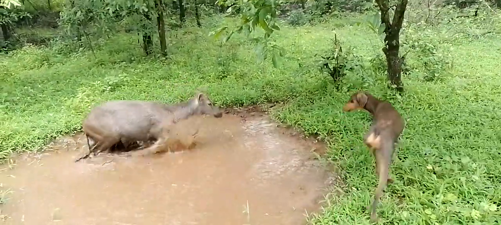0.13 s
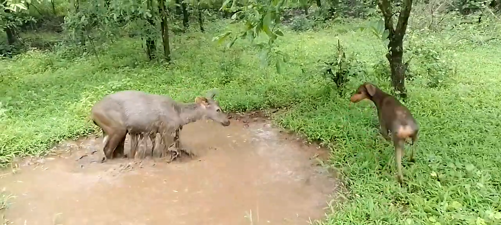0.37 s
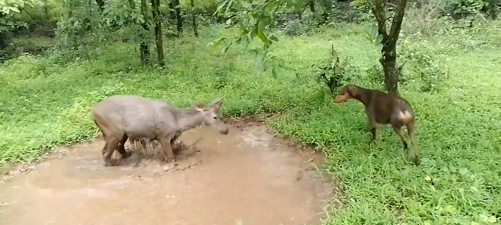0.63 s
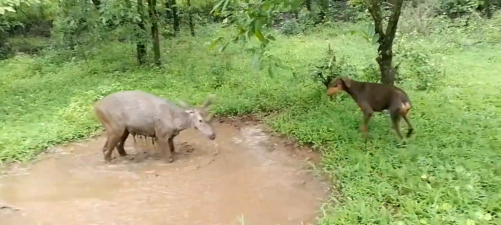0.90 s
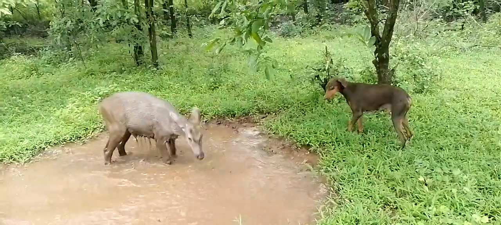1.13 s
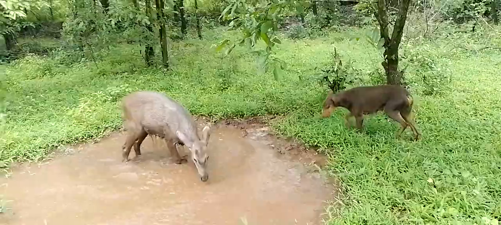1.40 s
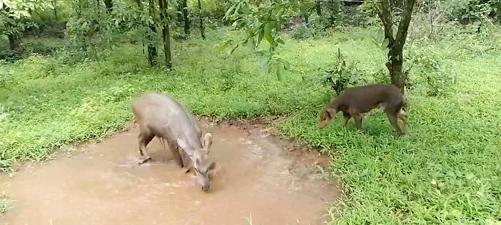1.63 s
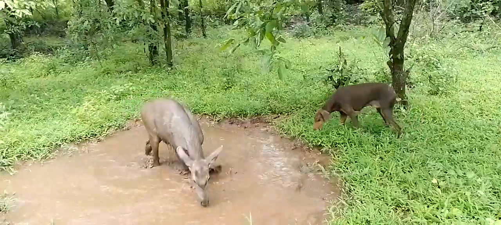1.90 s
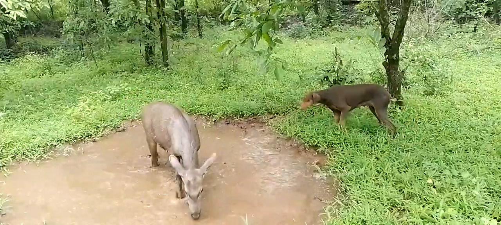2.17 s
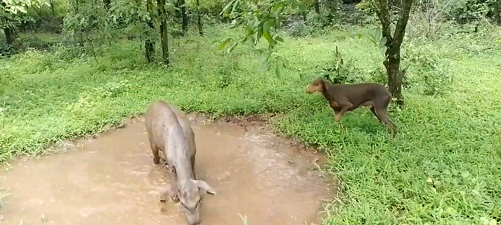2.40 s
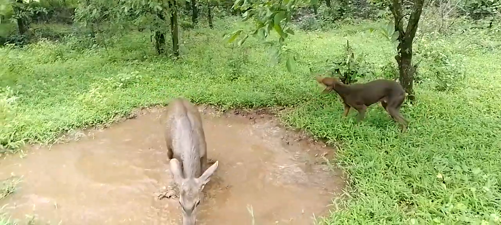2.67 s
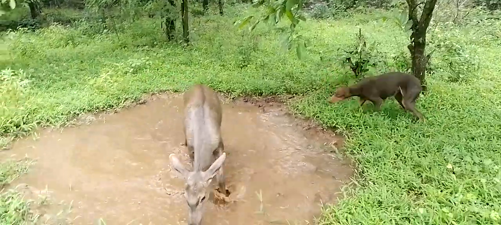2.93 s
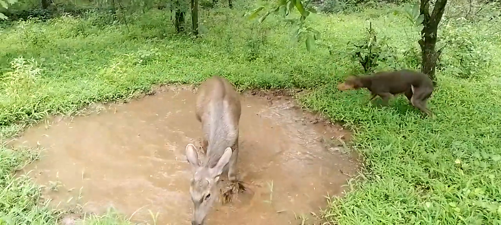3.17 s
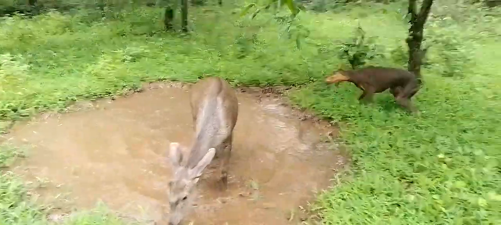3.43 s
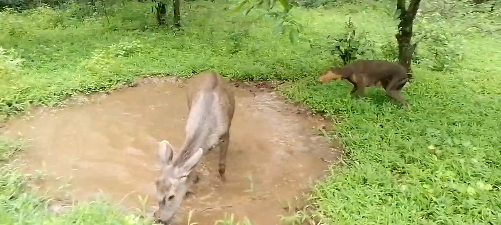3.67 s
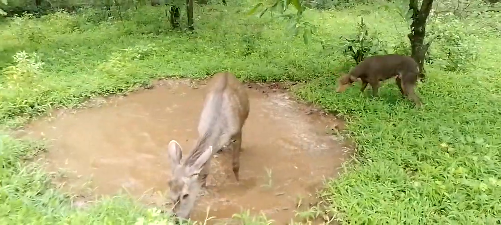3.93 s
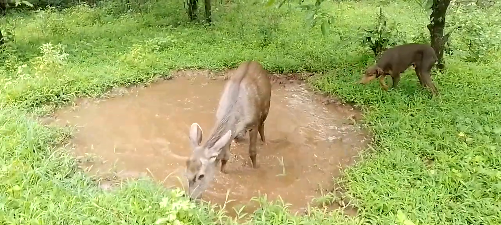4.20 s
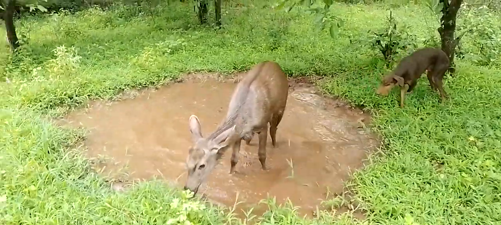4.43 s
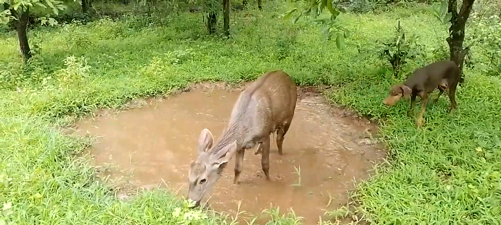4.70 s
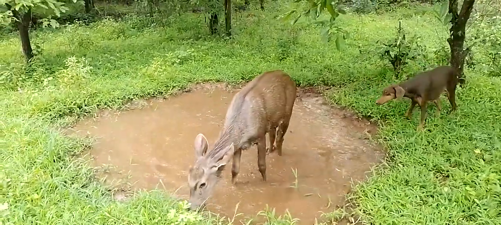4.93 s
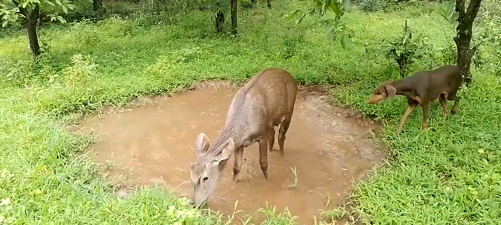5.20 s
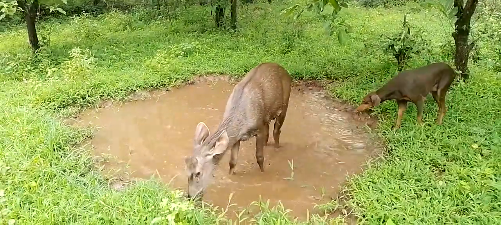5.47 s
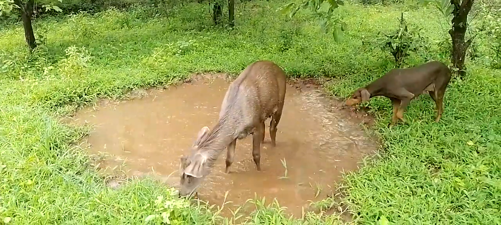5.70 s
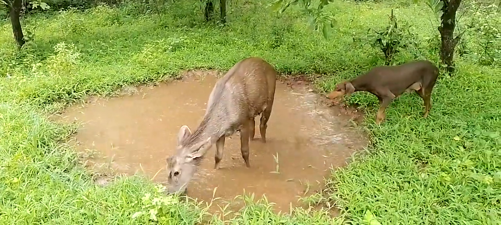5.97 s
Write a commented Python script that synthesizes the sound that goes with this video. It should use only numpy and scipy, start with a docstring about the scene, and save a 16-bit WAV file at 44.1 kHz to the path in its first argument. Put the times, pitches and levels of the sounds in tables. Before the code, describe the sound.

Bright, crisp splashing in shallow muddy water fades to small trickles and plips, while fine drops patter on leaves against constant outdoor hiss.

```python
"""A muddy puddle under dripping trees: a deer gets up and wades through it, heard by two microphone ports.
Behind all lies a steady hiss, patchy noise coloured by the ports; drops pat on leaves as short pushes.
At the water, droplet clicks crackle in a narrow treble ring of the left port, with noise ticks and faint mist,
and bubbles pop as damped, slightly rising tones. Wind adds a faint rumble on the ports."""
import sys
import numpy as np
from scipy import signal
from scipy.fft import rfft, irfft, next_fast_len
from scipy.io import wavfile
from scipy.ndimage import uniform_filter1d

SR = 44100
rng = np.random.default_rng(int(sys.argv[2]) if len(sys.argv) > 2 else 0)


def elevation(decibels):
    """Turn decibel levels (scalar or array-like) into linear amplitude ratios."""
    levels = np.asarray(decibels, float)
    return 10 ** (levels / 20)


def materialize(psi):
    """Save the field psi as 16-bit PCM at rate SR to the path in sys.argv[1].

    A 1-D psi becomes a single channel; in a 2-D psi each row is a channel.
    """
    bounded = np.clip(np.atleast_2d(psi).T, -1, 1)
    quanta = np.round(bounded * 32767).astype(np.int16)
    wavfile.write(sys.argv[1], SR, quanta)


N = 268524

# loud spits of spray at the left port: (time [s], envelope peak [dB], ring pitch [Hz])
SPIT_EVENTS = [(.0248, -25.5, 7620), (0.057, -23, 7730), (0.1088, -17, 7400), (.1526, -21.5, 7720),
               (.215, -25, 7700), (.2565, -20.5, 7780), (.32, -34, 7560), (.3516, -31, 7870),
               (0.433, -23, 7600), (0.4863, -27, 7340), (.54, -23, 7600), (.599, -24, 7600),
               (.611, -25, 7600), (.7178, -22, 7800), (.9232, -26.5, 7540), (.9956, -26, 7340),
               (1.103, -33, 7200), (1.1837, -29.5, 7720), (1.2705, -34, 7700), (1.3653, -31, 7710),
               (1.7814, -29, 7540), (2.0675, -19.5, 7820), (2.1224, -27, 7480), (2.18, -26.5, 7600),
               (2.215, -40, 7460), (2.5087, -30, 7760), (2.682, -29.5, 7240), (2.9146, -30, 7600),
               (3.287, -22.5, 7680), (3.3598, -30, 7560), (3.381, -29, 7450), (3.406, -24.5, 7620),
               (3.471, -25.5, 7400), (3.57, -32.5, 7700), (3.75, -34, 7530), (3.8075, -31.5, 7200),
               (3.92, -35, 7430), (4.0736, -36, 7810), (4.3398, -30, 7100), (5.5792, -37, 8600)]


def evened(x):
    """Scales to rms 1."""
    return x / np.sqrt(np.mean(x ** 2) + 1e-20)


def smoothed_twice(x, length):
    """Running mean applied twice, over a length in samples."""
    return uniform_filter1d(uniform_filter1d(x, length), length)


def read(points, hz):
    """Reads a spectrum on a log-frequency axis."""
    f, value = np.transpose(points)
    return np.interp(np.log(hz + 1), np.log(f + 1), value)


def scatter(s, sounds):
    """Lays each row of sounds into silence at its time."""
    at = np.clip(np.round(s * SR).astype(int)[:, None] + np.arange(sounds.shape[1]), 0, N)
    return np.bincount(at.ravel(), sounds.ravel(), N + 1)[:N]


def band(x, lo_hz, hi_hz, order):
    """Causal band-pass."""
    return signal.sosfilt(signal.butter(order, [lo_hz, hi_hz], "band", fs=SR, output="sos"), x)


def ports(x):
    """Each microphone port lifts the sound around its cavity resonance; the left one is also tilted."""
    # cavities of the left and right port: (resonance [Hz], width [Hz], lift [dB])
    cavities = [(7600, 1220, 16), (10860, 1840, 16)]
    # left port against right: (frequency [Hz], level [dB])
    left_colour = [(500, -2), (2000, 2.5), (4500, -1), (10000, 1), (13000, -2), (16000, 13)]
    size = next_fast_len(N)
    hz = np.fft.rfftfreq(size, 1 / SR)
    lift = np.array([1 + (elevation(db) - 1) / (1 + 1j * (hz ** 2 - f ** 2) / (hz * width + 1))
                     for f, width, db in cavities])
    lift[0] *= elevation(read(left_colour, hz))
    return irfft(rfft(x, size) * lift, size)[:, :N]


def rumble():
    """Wind on the ports: lumpy low noise, separate in each port, with a little higher bass common to both."""
    # (time [s], rumble level [dB])
    wind_level = [(0, -80), (.6, -82), (1.2, -95), (3.2, -91), (3.7, -79), (4.2, -97), (5.7, -94),
                  (6.09, -88)]
    gust_depth_db, gust_s = 4, .08
    both, left, right = rng.standard_normal((N, 3)).T
    separate = band(np.array([left, right]), 11, 43, order=2)
    common = 0.09 * band(both, 65, 220, order=2)
    gusts = evened(smoothed_twice(rng.standard_normal(N), round(gust_s * SR)))
    level_db = np.interp(np.arange(N) / SR, *np.transpose(wind_level)) + gust_depth_db * gusts
    return elevation(level_db) * evened(separate + common)


def hiss():
    """Steady background hiss: patchy noise whose likeness between the ports varies with frequency."""
    # colour before levelling: (frequency [Hz], relative density [dB])
    hiss_colour = [(200, 4.5), (550, 2), (800, 0), (1100, -2.5), (2000, 3), (4000, -4), (8000, -12.5),
                   (13000, -14.5), (16000, -23)]
    # left-right likeness: (frequency [Hz], correlation [-1 to 1])
    likeness = [(60, -0.28), (150, 0.89), (380, 1), (950, 0.18), (2380, -0.12), (5980, -0.11),
                (15000, 0.34)]
    level_db = -54  # rms ahead of the ports
    patch_db, flicker_db = 1.5, 0.29
    frames, hz = N // 128 + 5, np.fft.rfftfreq(512, 1 / SR)
    a, b, c, d, patches = rng.standard_normal((frames, 257, 5)).T
    patches = evened(uniform_filter1d(uniform_filter1d(patches, 12, 0), 10, 1))
    flicker = evened(uniform_filter1d(rng.standard_normal(frames), 4))
    same = np.clip(read(likeness, hz), -1, 1)[:, None]
    left = a + 1j * b
    right = same * left + np.sqrt(1 - same ** 2) * (c + 1j * d)
    colour_db = read(hiss_colour, hz)[:, None] + patch_db * patches + flicker_db * flicker
    z = np.array([left, right]) * elevation(colour_db)
    return elevation(level_db) * evened(signal.istft(z, nperseg=512, noverlap=384)[1][:, :N])


def pats(s, db, pan_db, lag_ms, push_ms):
    """A drop pushes the leaf once and it swings back weakly; the left port hears it lag_ms after the right."""
    u = np.arange(256) / SR / (push_ms[:, None] / 1000)
    push = np.sin(np.pi * u ** .8) * np.exp(-.75 * u)
    push *= (elevation(db) / push.max(1))[:, None]
    start = s - .3 * push_ms / 1000
    left = scatter(start + lag_ms / 1000, push * elevation(pan_db)[:, None])
    return np.array([left, scatter(start, push)])


def patter():
    """Many small drops all around, each a short push, louder in flurries."""
    drops_per_s, level_db = 1300, -54.5  # rms of the whole patter ahead of the ports
    s, size, pan, side, length = rng.random((round(drops_per_s * N / SR), 5)).T
    flurries = evened(smoothed_twice(rng.standard_normal(N), 600))
    relative_db = np.minimum(-3.0 * np.log(size + 1e-9), 11)  # a few drops are much louder
    relative_db += 1.5 * flurries[(s * N).astype(int)]
    lag_ms, push_ms = .5 * side - .05, .18 + 0.37 * length ** 1.5
    small = pats(s * N / SR, relative_db, 9 * (pan - .5), lag_ms, push_ms)
    return elevation(level_db) * evened(small)


def drops():
    """Near drops on leaves, and some middling ones at chance moments, as single pushes."""
    # ahead of the ports: (time [s], right peak [dB], left minus right [dB], push length [ms])
    near_drops = [(.151, -38, 5, 0.38), (0.2116, -36, 3, 0.47), (0.299, -40, 4, 0.61),
                  (.4877, -37, -1, .45), (0.5949, -36, 4, 0.35), (.6846, -35, 3, 0.29),
                  (.6963, -40, 3, 0.58), (.7053, -44, 6, 0.97), (.711, -51, 9, .5), (0.7185, -49, 12, 0.27),
                  (.8401, -44, -6, .38), (.9715, -36, 0, 0.68), (1.4309, -41, -5, .41),
                  (1.5475, -32, -3, 0.27), (1.565, -36, -4, 0.76), (1.5687, -29, 0.5, .55),
                  (1.571, -43, 5, .25), (1.582, -45, 8, .5), (1.6523, -39.5, -1, 0.7),
                  (1.7535, -38, 0, 0.55), (1.852, -38, -1, 0.48), (1.8864, -37, -5, 0.46),
                  (2.028, -40, 8, 0.25), (2.0382, -39, 6, 0.56), (2.108, -37, 4, 0.26),
                  (2.1153, -42, -1, 0.62), (2.2638, -37, -2, .36), (2.3408, -35.5, 4, 0.52),
                  (2.3593, -37, 2, 0.79), (2.4932, -34, -2, 0.33), (2.5932, -41, 2.5, 0.57),
                  (2.6744, -35, -5, 0.72), (2.6866, -42, -4, 0.54), (2.774, -40, 0, .51),
                  (2.7768, -34, 0.5, 0.37), (3.0376, -37.5, 2, .41), (3.0624, -42, -3, 0.34),
                  (3.233, -37, 4, 0.16), (3.3553, -33, -6, 0.43), (3.6896, -35.5, 1, 0.49),
                  (3.7795, -38, -1, 0.32), (3.81, -32, -1, 0.26), (3.871, -43, 6, 0.43),
                  (3.957, -36, -7, .45), (4.309, -34, -3, 0.47), (4.3834, -29, -5, 0.44),
                  (4.6476, -39, 1, 0.26), (4.7495, -34, -2, 0.41), (4.7514, -40, 0, .7),
                  (4.9723, -39.5, 1, 0.5), (5.1115, -35.5, -1, 0.39), (5.1626, -33, -3, .35),
                  (5.4133, -39, 2, 0.36), (5.5194, -38, -4, 0.79), (5.5434, -38, 0, 0.44),
                  (5.5651, -32, -4, 0.3), (5.7125, -39, 3, 0.34), (6.045, -37, 3, 0.3)]
    strays_per_s, stray_db = 7, -46  # the quietest middling drop, when it is centred
    s, db, pan_db, push_ms = np.transpose(near_drops)
    lag_ms = 0.22 + .2 * (rng.random(len(s)) - .5)
    near = pats(s, db, pan_db, lag_ms, push_ms)
    when, size, pan, side, length = rng.random((round(strays_per_s * N / SR), 5)).T
    pan_db = 18 * (pan - .5)
    db = stray_db + 2.7 * size - .5 * pan_db
    return near + pats(when * N / SR, db, pan_db, 0.55 * side, 0.21 + 0.74 * length)


def stir_db():
    """Spray level: the slow stirring of the water plus a short burst around every spit."""
    # how hard the water is stirred: (time [s], left spray level without bursts [dB])
    stirring = [(0, -44.5), (.05, -39), (.2, -34.5), (.36, -37), (.55, -36), (.75, -35), (.93, -37),
                (1.05, -42.5), (1.3, -45), (1.78, -46.5), (1.86, -41.5), (2.02, -44.5), (2.25, -41.5),
                (2.31, -45.5), (2.67, -46.5), (2.69, -40.5), (2.92, -38.5), (3.02, -44), (3.34, -43),
                (3.42, -41), (3.6, -42.5), (3.68, -47), (3.85, -44.5), (4.4, -48), (6.09, -50)]
    burst_db, lead_s, rise_s = -16, .012, .012  # level against the spit; it peaks with the spit's start
    s, db, _ = np.transpose(SPIT_EVENTS)
    u = np.arange(6000) / SR / rise_s
    bursts = scatter(s - lead_s, (elevation(db + burst_db)[:, None] * np.e * u * np.exp(-u)) ** 2)
    slow_db = np.interp(np.arange(N) / SR, *np.transpose(stirring))
    return 10 * np.log10(elevation(slow_db) ** 2 + bursts)


def pops(s, db, hz, t60, pan_db):
    """A damped tone that rises a little as the bubble nears the surface; pan_db is left minus right."""
    db, hz, t60, pan_db = (c[:, None] for c in (db, hz, t60, pan_db))
    t = np.arange(1800) / SR
    attack = 1 - np.exp(-t / 0.00083)
    tone = np.sin(2 * np.pi * hz * t * (1 + 1.2 * t)) * attack * elevation(db - 60 * t / t60)
    return np.array([scatter(s, tone), scatter(s, tone * elevation(-pan_db))])


def bubbles():
    """Damped tones: large bubbles each with three quieter ones, and tiny gurgles louder with the stirring."""
    # (time [s], left level before attack and decay [dB], starting pitch [Hz], 60 dB decay [s],
    #  left minus right [dB])
    large_bubbles = [(0.148, -38, 880, 0.024, 3), (.217, -42, 3170, .02, 8), (.298, -42, 1430, 0.036, 7),
                     (0.679, -43, 440, 0.029, 3), (.710, -32, 1650, 0.025, 19),
                     (1.745, -39.5, 400, 0.024, 0), (1.848, -46, 780, .025, 1), (2.021, -38, 540, 0.023, 3),
                     (2.052, -35.5, 1790, 0.031, 15), (2.060, -38, 1840, 0.063, 17),
                     (2.077, -43, 1850, 0.083, 12), (2.113, -46, 1500, 0.041, 5),
                     (2.180, -44, 1490, .03, 5), (2.285, -42, 610, .03, 0), (2.340, -33, 700, .02, 0),
                     (2.672, -42, 274, 0.025, -3), (2.684, -34.5, 740, 0.023, 1),
                     (2.760, -39, 730, 0.022, -3), (2.838, -44, 805, .03, -1), (3.328, -45, 1910, 0.069, 7),
                     (3.371, -36, 600, 0.013, 2), (3.393, -41, 804, 0.014, 2), (3.409, -44, 2180, 0.069, 7),
                     (4.093, -36.5, 1986, 0.035, 12), (5.155, -42.5, 810, 0.029, -2),
                     (5.797, -38.5, 513, 0.014, -1), (5.829, -43, 815, .03, 3)]
    gurgles_per_s, gurgle_offset_db = 500, -41
    s, db, hz, t60, pan_db = np.transpose(large_bubbles)
    out = pops(s, db, hz, t60, pan_db)
    for late, pitch in rng.random((len(s), 2, 3)).T:
        out += pops(s + .02 * (late - .3), db - 9, hz * (.75 + .6 * pitch), .6 * t60, pan_db)
    when, size, pitch, side = rng.random((round(gurgles_per_s * N / SR), 4)).T
    hz = 700 * 4.0 ** pitch
    db = gurgle_offset_db + 0.45 * stir_db()[(when * N).astype(int)]
    db += np.minimum(-3.5 * np.log(size + 1e-9), 14)
    return out + pops(when * N / SR, db, hz, 18 / hz, 4.1 + 6 * (side - .5))


def ticks():
    """Sharp ticks of flung droplets: a short burst of treble noise with a small tail."""
    # ahead of the ports: (time [s], left peak [dB], left minus right [dB], decay time [ms], lower edge [Hz])
    flung_droplets = [(.389, -43.5, 3, .6, 9000), (.718, -48, 2, .5, 8500), (2.064, -44, 4, 1.5, 9000),
                      (2.177, -45, 4, 1.2, 10000), (2.508, -45, 6, 1.0, 6500), (2.682, -45, 4, .8, 6500),
                      (2.844, -38, 5, .6, 12300), (3.291, -31, 7, 1.2, 9500), (3.2953, -45, -1, 1.5, 9000),
                      (3.398, -54, 0, 1.5, 10900), (3.708, -49, 2, .6, 11000), (3.807, -43.5, 7, .8, 6500),
                      (4.3398, -41, 6, .8, 7000), (5.579, -48, 1, 1.0, 5500)]
    s, db, pan_db, length_ms, low_hz = np.transpose(flung_droplets)
    high_hz = np.minimum(1.54 * low_hz, 15200)
    t = np.arange(600) / SR
    shape = np.exp(-t / (length_ms[:, None] / 1000)) + 0.22 * np.exp(-t / 0.0035)
    noise = rng.standard_normal((len(s), 2, 600)) * shape[:, None]
    burst = np.array([band(x, low, high, order=3) for x, low, high in zip(noise, low_hz, high_hz)])
    burst /= abs(burst).max(2, keepdims=True)
    left = scatter(s, burst[:, 0] * elevation(db)[:, None])
    right = scatter(s, burst[:, 1] * elevation(db - pan_db)[:, None])
    return np.array([left, right])


def ring(x):
    """Colours clicks with the steep-skirted treble ring of the left port."""
    # colour before levelling: (frequency [Hz], relative level [dB])
    ring_colour = [(5000, -33), (6850, -13.5), (7200, -3), (7480, -4), (7700, 0.5), (7950, -5),
                   (8200, -7.5), (8450, -17), (10500, -24)]
    size = next_fast_len(N)
    hz = np.fft.rfftfreq(size, 1 / SR)
    return evened(irfft(rfft(x, size) * elevation(read(ring_colour, hz)), size)[:N])


def power_db(x):
    """Short-time spectrum and its power, smoothed over about 70 ms."""
    z = signal.stft(x, nperseg=512, noverlap=384)[2]
    power = uniform_filter1d(uniform_filter1d(abs(z) ** 2, size=2, axis=0), size=24, axis=1)
    return z, 10 * np.log10(power + 1e-20)


def suppressor(x, steady):
    """Cuts every bin under the threshold, so the ring shows sharp edges and widens as it gets louder."""
    gate_db = -47.5  # spray level whose crest reaches the middle of the soft threshold
    cut_db, soft_db = -13, 1.5
    z, level_db = power_db(x)
    crest_db = np.median(power_db(steady)[1], axis=1).max()
    opened = .5 + .5 * np.tanh((level_db - crest_db - gate_db) / soft_db)
    return signal.istft(z * elevation(cut_db * (1 - opened)), nperseg=512, noverlap=384)[1][:N]


def spray():
    """Droplet clicks in clumps follow the stirring; they ring the left port and hiss faintly in both."""
    clicks_per_s = 5000
    db = stir_db()
    hit, size, sign = rng.random((N, 3)).T
    clumps = elevation(1.2 * evened(smoothed_twice(rng.standard_normal(N), 300)))
    clicks = (hit < clicks_per_s / SR) * size ** -.1 * np.sign(sign - .5) * clumps
    ringing = ring(clicks)
    left_alone = suppressor(elevation(db) * ringing, ringing) * [[1], [0]]
    mist = evened(band(rng.standard_normal((N, 2)).T * clumps, 1400, 9200, order=1))
    # the mist grows more slowly than the ring
    return left_alone + ports(elevation(-42.4 + 0.4 * db) * mist)


def spits():
    """A handful of droplets at once: the left ring swells and dies in a few milliseconds."""
    rise_ms = 0.74
    s, db, hz = np.transpose(SPIT_EVENTS)[:, :, None]
    t = np.arange(600) / SR
    u = t / (rise_ms / 1000)
    swell = elevation(db) * np.e * u * np.exp(-u)
    return scatter(s[:, 0], swell * np.sin(2 * np.pi * hz * t)) * [[1], [0]]


def scene():
    """Hiss, drops, ticks and mist pass the ports; ring and spits are already ringing; bubbles go direct."""
    through_ports = hiss() + patter() + drops() + ticks()
    return ports(through_ports) + bubbles() + spray() + spits()


def wind_filter(x):
    """Cuts the bass steeply, and everything above the top edge of the treble."""
    # (frequency [Hz], gain [dB])
    filter_curve = [(150, -23), (175, -25.5), (210, -14.5), (250, -4.5), (310, -0.5), (15800, -0.5),
                    (15930, -60)]
    size = next_fast_len(N + SR)
    hz = np.fft.rfftfreq(size, 1 / SR)
    return irfft(rfft(x, size) * elevation(read(filter_curve, hz)), size)[:, :N]


def roll_off(x):
    """The treble ends steeply here."""
    return signal.sosfilt(signal.butter(12, 16170, fs=SR, output="sos"), x)


def record(dry):
    """The wind filter thins the bass of the scene; the faint rumble is added after it."""
    mix = wind_filter(dry) + rumble()
    return roll_off(mix)


dry = scene()
out = record(dry)
materialize(out)
```